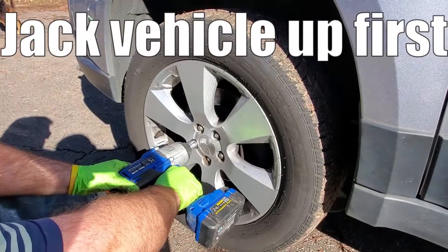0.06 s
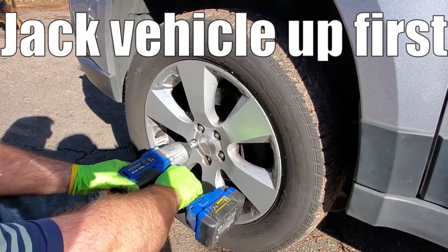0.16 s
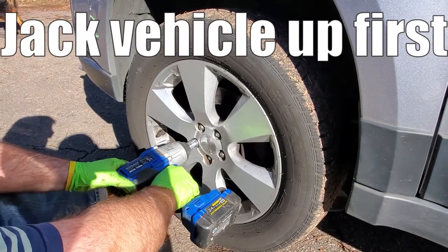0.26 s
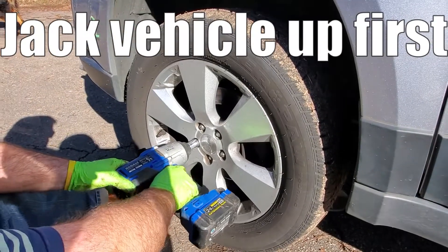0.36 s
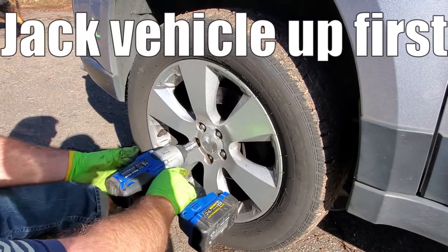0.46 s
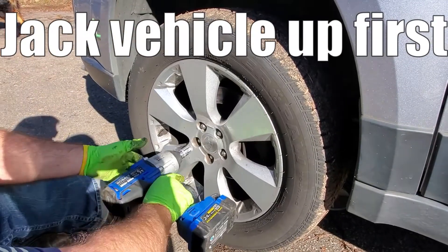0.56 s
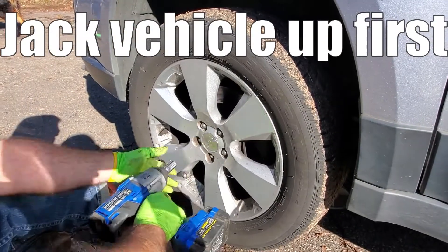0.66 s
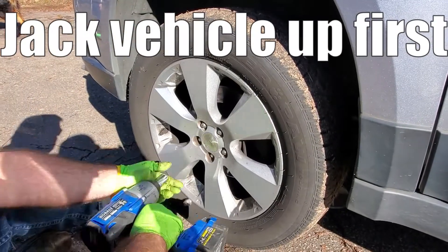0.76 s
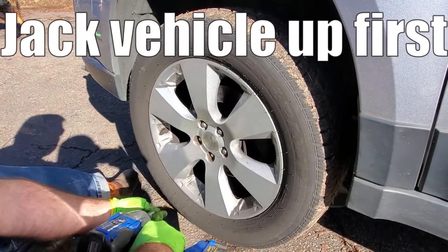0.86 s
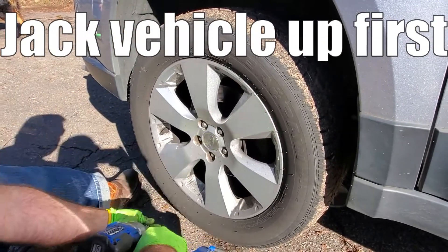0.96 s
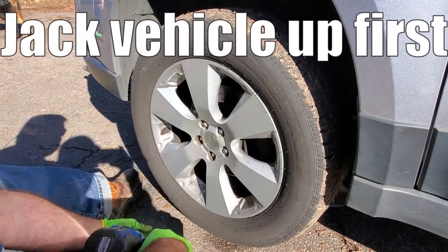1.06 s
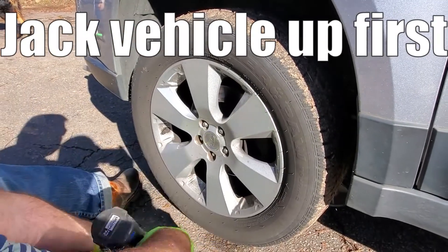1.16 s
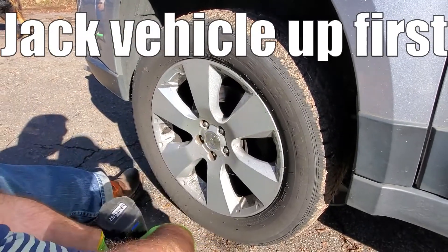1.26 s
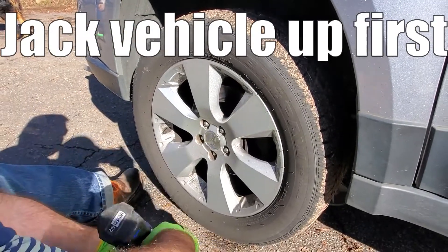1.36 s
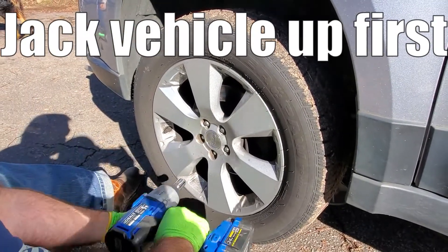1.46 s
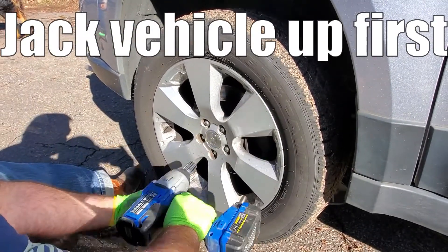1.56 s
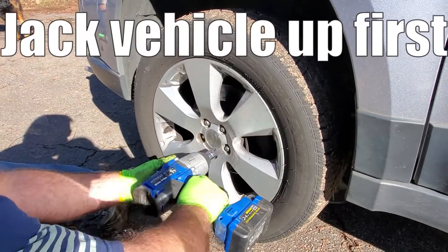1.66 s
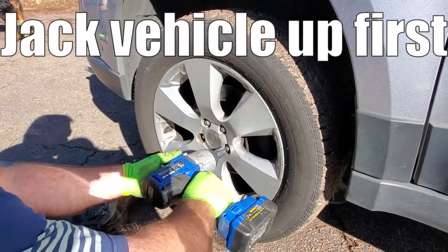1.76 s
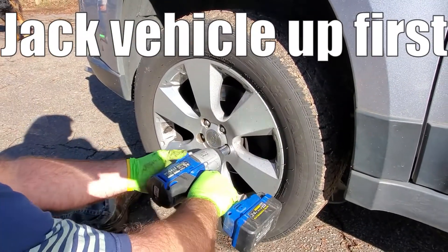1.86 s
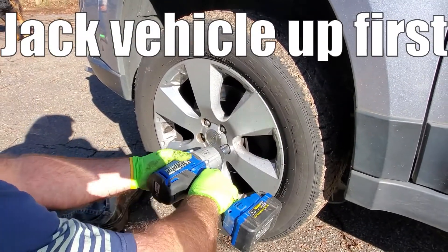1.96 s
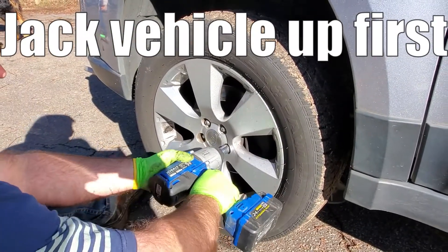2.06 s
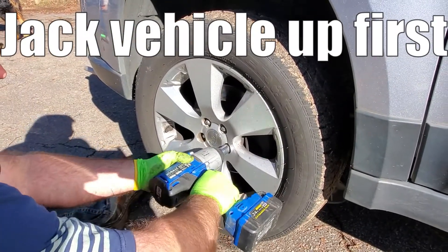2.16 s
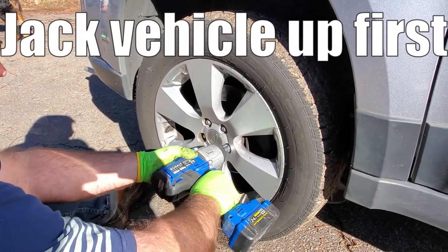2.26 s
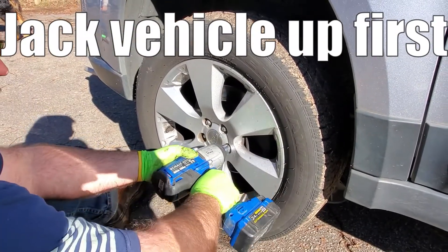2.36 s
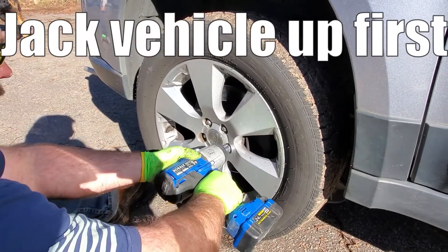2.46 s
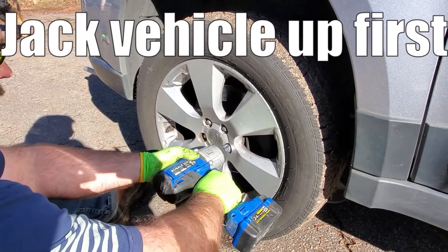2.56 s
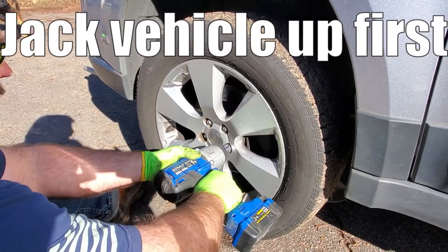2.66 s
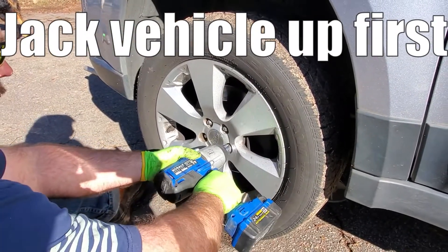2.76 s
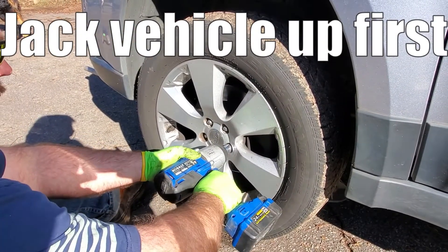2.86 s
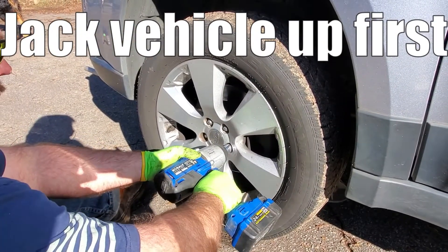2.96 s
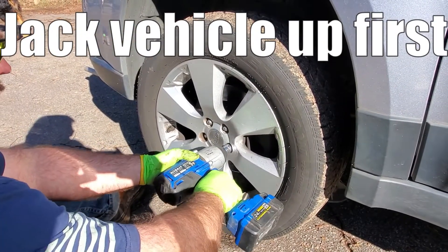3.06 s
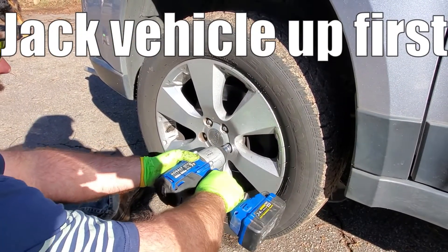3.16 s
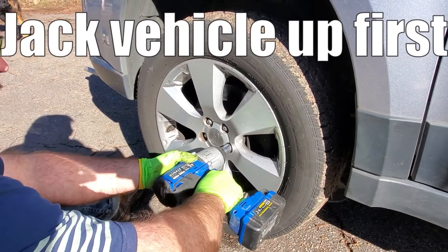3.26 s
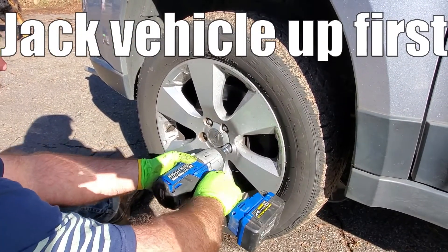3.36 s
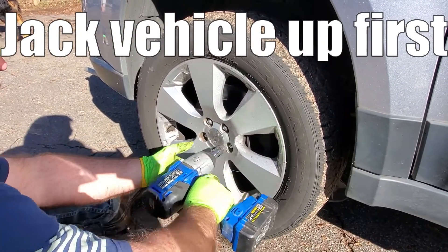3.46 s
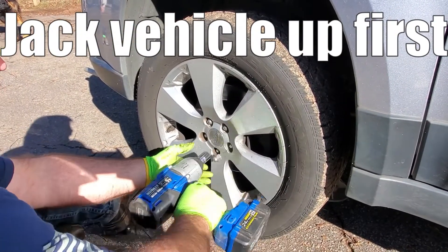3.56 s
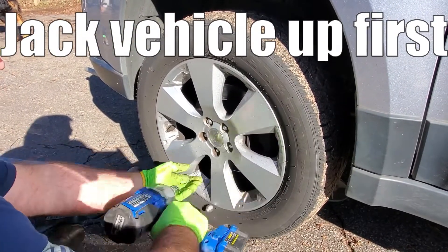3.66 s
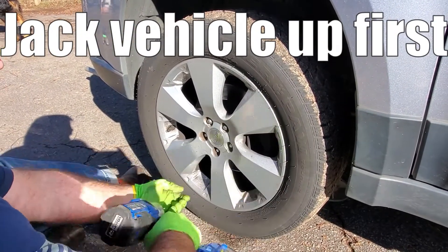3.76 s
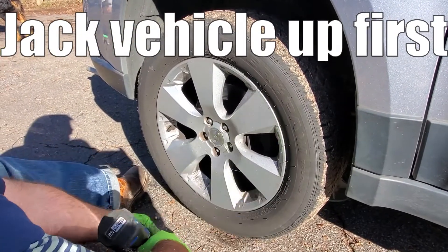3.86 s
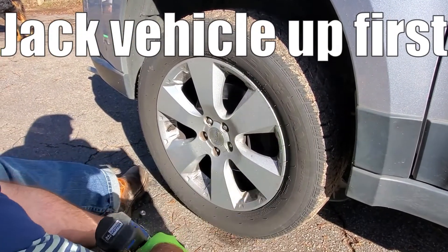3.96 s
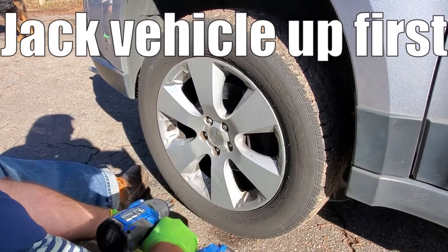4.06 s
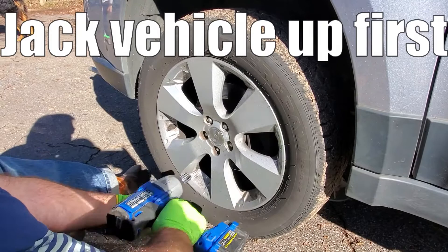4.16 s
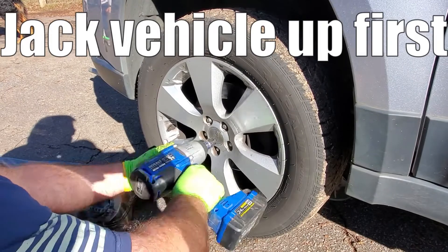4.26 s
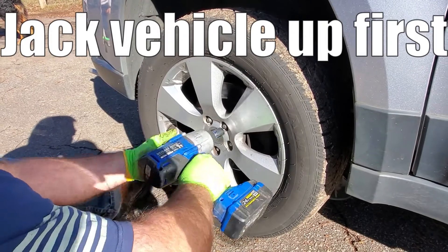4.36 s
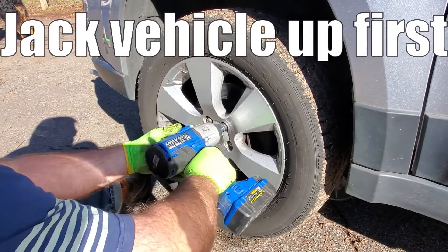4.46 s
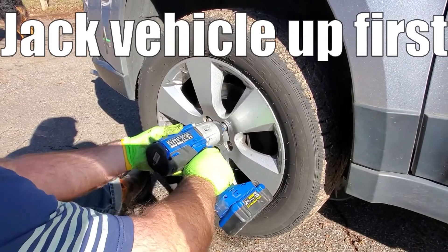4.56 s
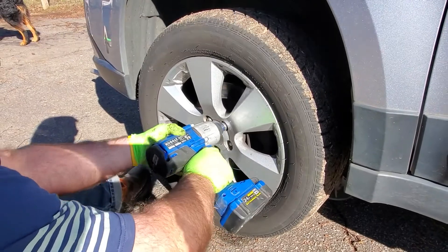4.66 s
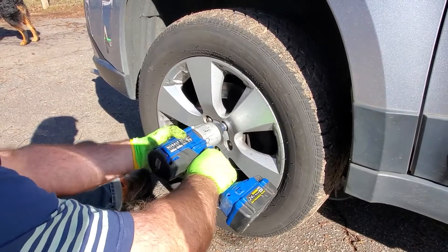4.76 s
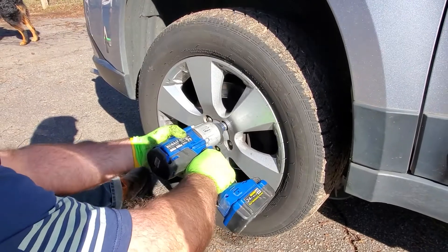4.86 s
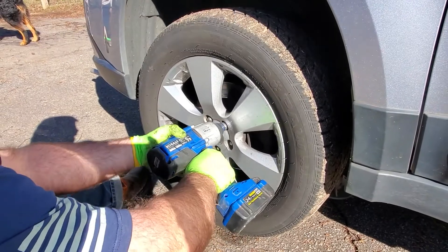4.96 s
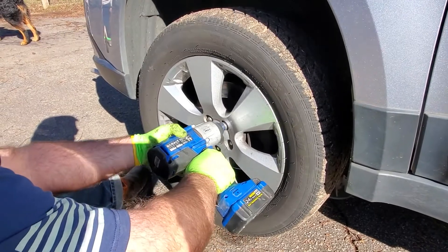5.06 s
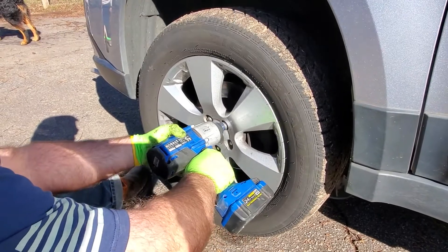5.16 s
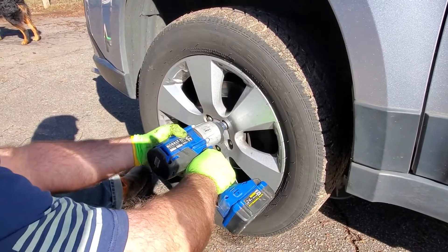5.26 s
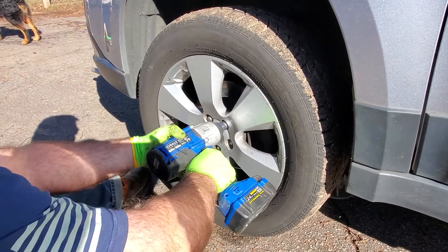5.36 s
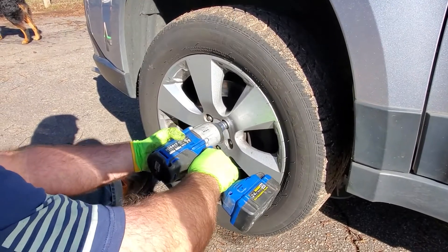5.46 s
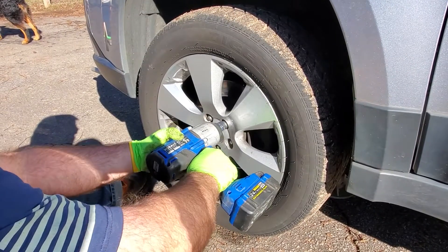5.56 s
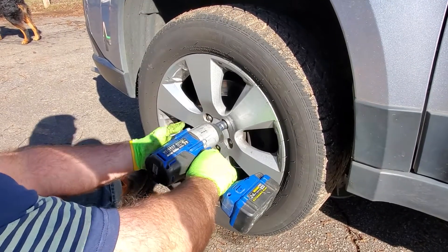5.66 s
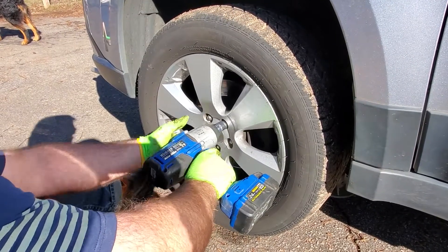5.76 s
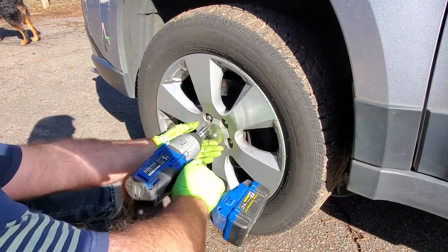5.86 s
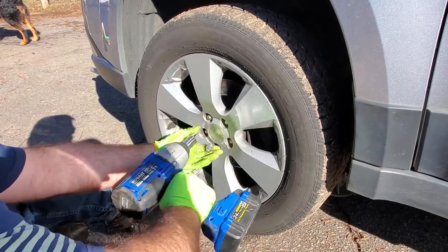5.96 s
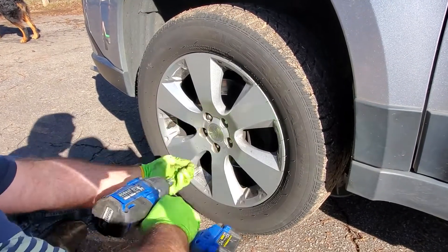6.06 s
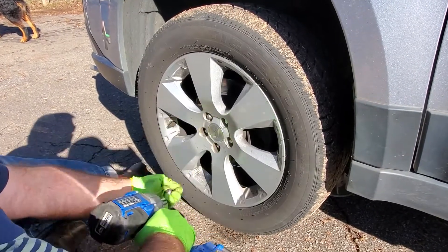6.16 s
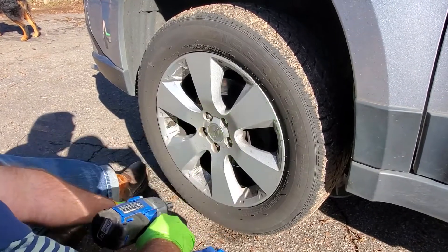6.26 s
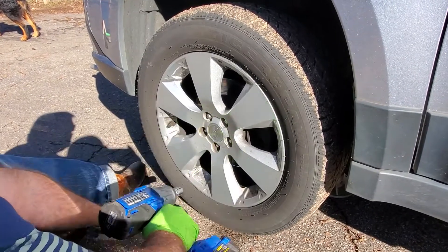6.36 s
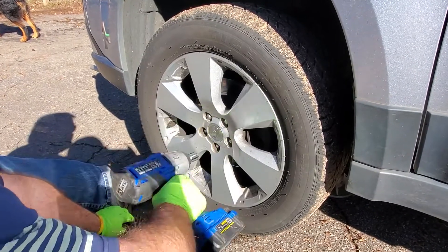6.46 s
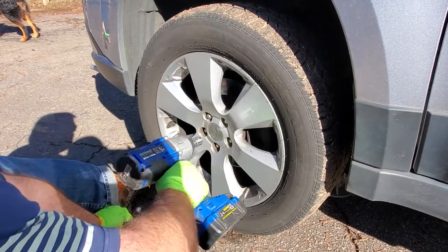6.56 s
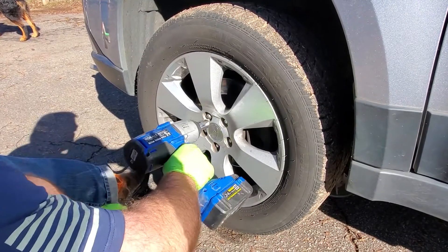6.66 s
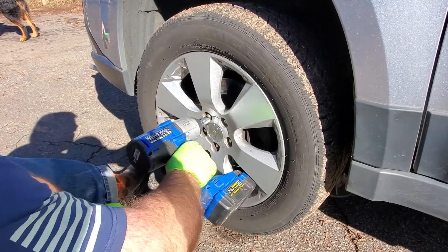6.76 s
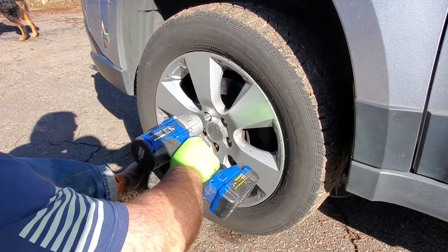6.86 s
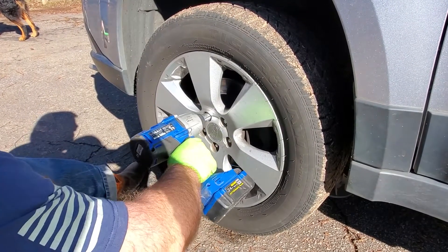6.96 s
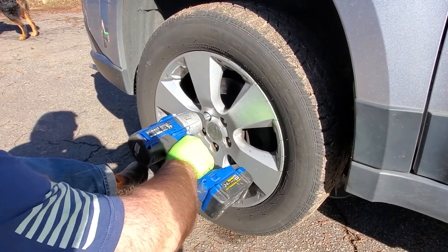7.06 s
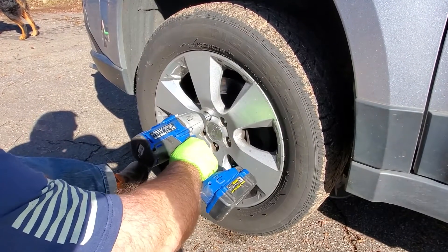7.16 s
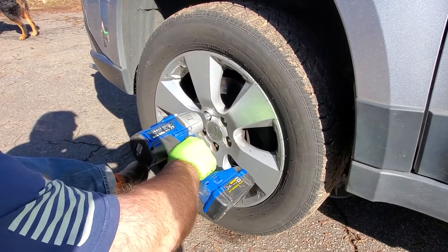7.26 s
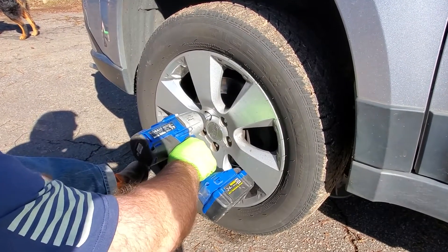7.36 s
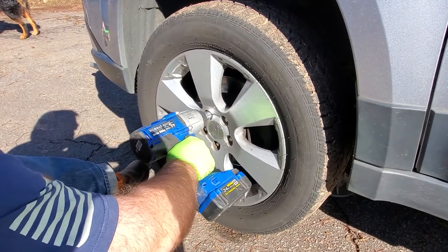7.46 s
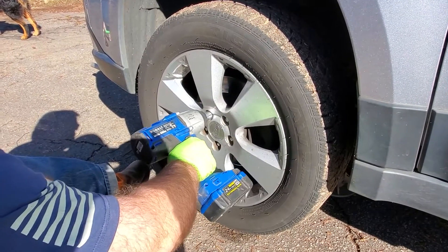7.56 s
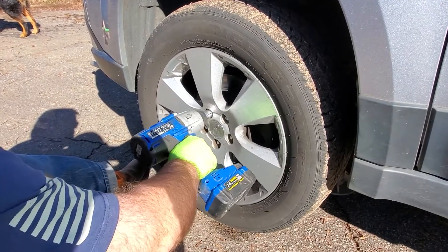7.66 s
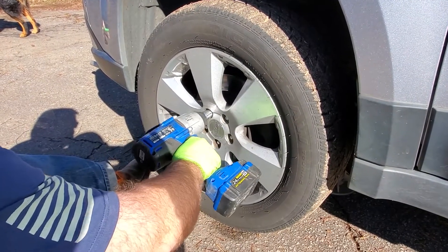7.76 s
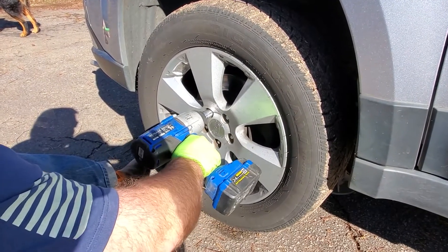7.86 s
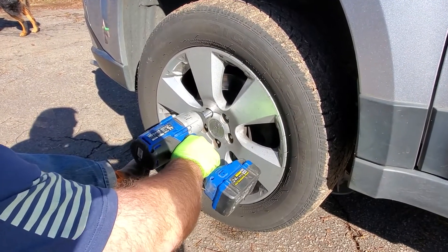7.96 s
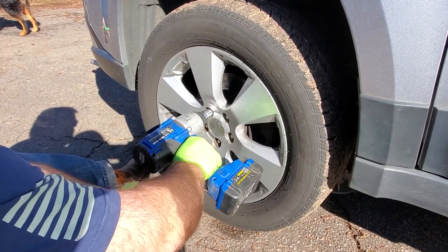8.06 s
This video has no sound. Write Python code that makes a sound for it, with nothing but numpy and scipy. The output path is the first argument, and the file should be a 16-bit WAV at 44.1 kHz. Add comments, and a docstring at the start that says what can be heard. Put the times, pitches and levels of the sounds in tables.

```python
"""A cordless impact wrench loosens wheel nuts outdoors, an arm's length from a small stereo camera.
A first knock leads into a free-running motor that coasts down with a falling whine: gliding sine lines.
On three more nuts the socket knocks and whistles, the hammer strikes about 41 times a second, and the motor
runs free again. Blows are bursts of coloured noise that kick socket and wheel modes into ringing; whir, hiss
and ticks run along, with brief treble squeaks. Throughout, filtered noise makes wind rumble and drones."""
import sys
import numpy as np
from scipy import signal
from scipy.fft import rfft, irfft, next_fast_len
from scipy.io import wavfile
from scipy.ndimage import uniform_filter1d

SR = 44100
rng = np.random.default_rng(int(sys.argv[2]) if len(sys.argv) > 2 else 0)


def dump(signal):
    """Clip the signal to [-1, 1] and save it as 16-bit WAV at the path in sys.argv[1]."""
    limited = np.clip(np.atleast_2d(signal).T, -1, 1)
    pcm = np.round(limited * 32767).astype(np.int16)
    wavfile.write(sys.argv[1], SR, pcm)


N = 358091
T = np.arange(N) / SR  # time, s

# Hammer on anvil, settling to 41 blows a second: start_s, level_db, treble_db (above level)
HAMMER_BLOWS = [(2.5503, -23, -2.5), (2.5673, -36, 12), (2.5803, -34, -8), (2.5895, -24.5, -5),
                (2.6001, -31.5, 3), (2.6132, -26, -9), (2.6364, -21, -3.5), (2.6626, -25.5, -18),
                (2.6698, -23.5, 0), (2.689, -33, -2), (2.697, -23.5, -5), (2.7223, -24.5, -1),
                (2.748, -24.5, 2), (2.7729, -23.5, 0), (2.798, -27, 3.5), (2.8223, -23, .6),
                (2.8472, -28.5, 0), (2.871, -24, 0), (2.8947, -23, 1), (2.919, -23, 0), (2.9439, -24, 0),
                (2.968, -26, 1), (2.992, -22.5, 0.5), (3.0162, -23.5, 0.5), (3.0423, -28, 4),
                (4.91, -28.5, 6.5), (4.9229, -25.5, -2), (4.9384, -25.5, -8), (4.9473, -25, -3),
                (4.9556, -22, -0.5), (4.9677, -30.5, 3), (4.9814, -22.5, -3), (4.9923, -26.5, 1),
                (5.0149, -27, -11), (5.0227, -29, 4), (5.0408, -31, -12), (5.051, -22.5, 0.5),
                (5.0763, -24.5, .6), (5.1012, -27, 1), (5.126, -25, 0.5), (5.1504, -34, 9),
                (5.1752, -24, 3.5), (5.1995, -28, 6), (5.2234, -25.5, 3.5), (5.241, -35.5, -7),
                (5.248, -23, 2.5), (5.2717, -25, 5.5), (5.2965, -25, 2.5), (5.322, -30, -24),
                (5.3471, -28, 6.5), (5.3735, -21.5, -0.7), (7.25, -33.5, 10.5), (7.2768, -26, -15),
                (7.2842, -22, -1.5), (7.295, -26, 1.1), (7.322, -29, -15), (7.3306, -23.5, 7),
                (7.3476, -33, 0), (7.3536, -26, -13), (7.3627, -29, 5), (7.3814, -28, -18),
                (7.3899, -25.5, 4), (7.415, -23.5, 2.5), (7.4399, -26.5, 5), (7.4645, -21, -14),
                (7.4892, -26.5, 7), (7.5135, -24.5, 4), (7.5375, -25, 0.5), (7.5609, -23, 1),
                (7.5861, -24, 5.5), (7.6099, -22.5, 1), (7.6347, -24, 2), (7.6599, -28.5, 3.5)]
# Socket knocks and jolts on the nut, and the last hammer blows as it breaks loose:
# start_s, level_db, treble_db (above level), thud_db (above level), t60_s
KNOCKS_AND_LAST_BLOWS = [(0.0086, -26, -4.5, -14.5, 0.055), (0.029, -46.5, -14, -2, 0.037),
                         (0.0521, -39, -11, -18.5, .042), (1.849, -28.5, -12, -13, 0.043),
                         (1.8543, -23, -6.5, -1.5, 0.057), (1.908, -32.5, -17, -21, 0.055),
                         (1.947, -27.5, -13, -27, 0.036), (1.9712, -36, -19, -15, 0.049),
                         (1.9925, -36, -14, -22, .037), (2.0098, -41, -20, 4.5, 0.037),
                         (2.0254, -23, -16, -19, 0.022), (2.0427, -35, -17, 1.5, 0.067),
                         (2.058, -29, -16, -22, .034), (2.0699, -35, -16, -15, 0.028),
                         (2.0882, -31, -21, -26, 0.026), (2.1128, -37, -16, -14, 0.061),
                         (2.1435, -39.5, -15, -13, 0.037), (2.2524, -32, -11, -17, .12),
                         (2.2903, -29, -12, -4.5, .036), (2.3029, -27.5, -7, -4.5, .04),
                         (2.3255, -21.5, -7, -36, .025), (2.3375, -23.5, -3.5, -20, .056),
                         (2.359, -25.5, -5, -7, 0.078), (2.3821, -21.5, -15, -3.5, 0.03),
                         (2.4034, -29, -4, -13, .069), (2.4161, -25.5, -13, -7, 0.056),
                         (2.4318, -25.5, -11, -17, .022), (2.4484, -26, 0.5, -13, 0.077),
                         (2.512, -36, -12, -15, .04), (2.517, -21.5, -14, -10.5, 0.043),
                         (2.5325, -32, -11, -5.5, 0.15), (3.0683, -25, -0.5, -6.5, 0.032),
                         (3.1066, -39, -13, -18, 0.086), (3.862, -40, -11, -16, 0.048),
                         (4.5015, -35, -2.5, -9, 0.068), (4.5129, -36, -9, 0, 0.042),
                         (4.522, -39.5, -4, 5, 0.076), (4.5314, -33, -17, 2, 0.0099),
                         (4.6067, -31, -14, -15.5, 0.064), (4.6581, -28.5, -6.5, 1.5, 0.068),
                         (4.6782, -37, -17, -10, 0.06), (4.7271, -29.5, -20, -41, 0.023),
                         (4.7441, -37, -21, -18.5, 0.043), (4.758, -29, -15, -19, 0.025),
                         (4.783, -38, -16, -13, 0.026), (4.839, -25.5, -6, -8, 0.11),
                         (4.8813, -22.5, -8, -15, 0.048), (4.8975, -23.5, -5, -11.5, 0.058),
                         (5.3898, -38, -7, -4, 0.022), (6.9249, -36, -28, -11, 0.068),
                         (6.9514, -40.5, -16, 2.5, 0.12), (6.9651, -22.5, -1, -11, 0.039),
                         (7.0322, -38, -10, -25.5, .035), (7.044, -33, -16, -22, .022),
                         (7.0688, -23, -9.5, 0.7, 0.064), (7.0917, -39, -12, -8, .049),
                         (7.1324, -29, -16, -17, .029), (7.1553, -24.5, -19, -26, .032),
                         (7.1744, -22.5, -2.5, -9.5, 0.058), (7.218, -21.5, -8, -10.5, 0.037),
                         (7.2354, -21.5, -7, -11, .046), (7.6851, -29.5, 2.5, -11.5, 0.04)]
# Colour of struck socket and anvil: pitch_hz, relative level_db (per Hz)
STEEL_COLOUR = [(88, -48), (150, -18), (291, -10.5), (354, -25.5), (612, -16), (821, -5), (1120, 3),
                (1900, -8), (2270, -4), (2870, -4.5), (6510, -9.5), (10000, -5), (11300, -7), (14500, -5.5),
                (16000, -4)]
# Colour of the knock through wheel and hub: pitch_hz, relative level_db (per Hz)
THUD_COLOUR = [(70, -37), (180, -1), (420, -2), (700, 0), (1300, 1)]
# Brief modes of socket and anvil: pitch_hz, level_db (against the blow), t60_s
SOCKET_MODES = [(1764, -21.5, 0.049), (2290, -12.5, 0.021), (2630, -17.5, 0.018), (2878, -15, 0.063),
                (3310, -16, 0.052), (3773, -14, 0.032), (4390, -17, 0.013), (6636, -15, 0.034),
                (8270, -13, 0.0095), (11390, -13.5, 0.017), (14650, -13, 0.024)]
# Wheel modes: pitch_hz, t60_s, then level_db at each of six places (against the thud)
WHEEL_MODES = [(525.6, 0.84, -7, -26.5, -29, -28, -30, -23), (612, 1, -0.5, -25.5, -23, -9.5, -12.5, -14.5),
               (1084, 0.95, -21, -22, -12, -27, -14, -18.5), (1190, 0.3, -14, -20, -22, -26, -18, -17)]
# When the socket touches the wheel at a new place: start_s
NEW_PLACE_S = [1.8, 2.4, 4.4, 4.65, 6.8]
# Free running: loose_s (nut comes loose), released_s (trigger let go), end_s (next nut),
# free_hz (rotor rate, before its slow gain), rest_s (time to coast to rest), level_db
FREE_RUNS = [(.03, .42, 1.84, 581, 2.0, 0), (3.085, 3.42, 4.49, 580, 2.05, 1.5),
             (5.39, 5.78, 6.92, 582, 2.12, 0), (7.71, 8.5, 8.5, 578, 2.1, -3)]
# Strong motor lines: multiple (of rotor rate), level_db (at REFERENCE_HZ), slope_db (per octave of rotor rate)
STRONG_MOTOR_LINES = [(8.01, -50, 12), (6, -67, -3.5), (10, -65, 3)]
# Housing resonances the strong lines glide across: pitch_hz, gain_db
HOUSING_PEAKS = [(500, -5), (900, 0), (1200, 2), (1600, -0.5), (2050, -8), (2450, 0), (2650, -3),
                 (2860, 0.5), (3070, -7), (3400, 9), (3600, 1), (3780, 7.5), (3950, -2), (4200, 6.5),
                 (4480, -4), (4650, 2.5), (4900, -0.5), (5500, -12), (6000, -10.5)]
# Weaker motor lines: multiple (of rotor rate), power_db (under power), coast_db (coasting)
WEAK_MOTOR_LINES = [(2, -65, -65), (2.75, -57, -72), (4, -57, -77), (5, -70, -71), (5.5, -70, -86),
                    (7, -75, -68), (11, -78.5, -73), (12, -85, -80), (14, -85, -79)]
# Housing gain for the weaker lines: pitch_hz, gain_db
HOUSING_GAIN = [(500, -21), (800, -7), (1100, -0.5), (1500, -5), (2000, -9), (2800, 4.5), (4000, 7.5),
                (5000, -9), (10000, -23)]
# Rough whistles as the trigger is pulled: start_s, end_s, pitch_hz, level_db
TRIGGER_WHISTLES = [(2.25, 2.333, 3565, -33.5), (2.252, 2.34, 15500, -52), (4.798, 4.89, 15600, -61),
                    (4.812, 4.843, 7840, -54), (7.186, 7.22, 3570, -34), (7.18, 7.235, 15600, -50)]
# Level curves of the running noise, read with straight lines between rows: start_s, whir_db, hiss_db
RUNNING_LEVELS = [(0, -35, -45), (.1, -40, -44), (.44, -41, -47), (.83, -48.5, -55), (1.15, -49.5, -61.5),
                  (1.54, -43, -54.5), (1.84, -46.5, -63), (2.1, -43.5, -62), (2.225, -64.5, -70),
                  (2.26, -35, -52), (2.42, -29, -50), (2.46, -36, -35), (2.505, -38, -61),
                  (2.55, -30.5, -41), (3.06, -34.5, -45), (3.128, -40, -43.5), (3.577, -43, -53),
                  (4.205, -54.5, -61.5), (4.345, -44.5, -55.5), (4.49, -44, -58.5), (4.56, -48.5, -59),
                  (4.8, -43, -60), (4.9, -31.5, -44), (5.38, -38.5, -47), (5.443, -39.5, -45),
                  (5.77, -43.5, -50), (6.43, -52, -60), (6.585, -46.5, -57), (6.88, -41.5, -56.5),
                  (7.0, -47.5, -70), (7.15, -42.5, -58), (7.24, -30, -40), (7.69, -35, -43),
                  (7.717, -41, -46.5), (7.89, -40, -45.5), (8.117, -42.5, -48)]
# Colour of the whir at low rotor rates: pitch_hz, relative level_db (per Hz)
SLOW_WHIR_COLOUR = [(120, -32), (300, -28.5), (540, -21.5), (800, -12.5), (1300, -3.5), (2050, -5.5),
                    (2290, 3), (2550, -4.5), (3500, -7), (4600, -13), (6050, -14.5), (6450, -4),
                    (6850, -14.5), (9000, -25)]
# Colour of the whir near full speed: pitch_hz, relative level_db (per Hz)
FAST_WHIR_COLOUR = [(120, -31.5), (600, -10.5), (900, -9.5), (1600, -3), (1950, -5.5), (2300, -2),
                    (2600, -5), (3200, -4.5), (3850, -1.5), (4400, -4.5), (5200, -12.5), (6400, -6),
                    (7300, -16), (9000, -18)]
# Colour of the loose steel ticks: pitch_hz, relative level_db (per Hz)
CHATTER_COLOUR = [(4000, 20.5), (8000, -4.5), (10000, -2), (11500, -3), (14500, -6.5), (16500, -13)]
# Thin treble squeaks and ticks: start_s, level_db, pitch_hz, t60_s
TREBLE_SQUEAKS = [(0.5048, -51, 14470, 0.06), (0.6644, -45, 14370, 0.077), (0.8924, -59, 14420, 0.06),
                  (3.4151, -44, 14500, 0.11), (3.4486, -43, 13940, 0.048), (4.9003, -24, 14000, 0.06),
                  (4.9244, -23, 13900, 0.06), (5.6854, -48, 14000, 0.042), (5.692, -45, 13800, 0.06),
                  (5.7329, -40, 14500, 0.064), (5.7808, -45, 14500, 0.058), (5.8252, -43, 14000, 0.061),
                  (7.237, -22.5, 14600, 0.11), (7.9994, -42, 14200, 0.063), (8.0394, -59, 14500, 0.053),
                  (8.0676, -52, 14300, 0.055)]
# Wind curves, read with straight lines between rows: start_s, level_db, pan_db (left minus right)
WIND_LEVELS = [(0, -57, -1), (.65, -74.5, 2), (1.08, -66.5, 9), (1.35, -52, 14), (1.5, -58.5, 0),
               (1.7, -44, 5), (1.79, -56, -1), (1.94, -39.5, 13.5), (2.12, -44, -4), (2.24, -46.5, 7),
               (2.5, -48, -2), (2.65, -58.5, -4), (3.5, -69, 3), (4.25, -73, 2), (4.57, -50.5, -4),
               (4.86, -45.5, -1), (4.95, -64.5, 0), (5.45, -58, 0), (6.26, -78, -2), (6.81, -59, 0),
               (7.1, -47.5, 0), (7.24, -51, 2), (7.35, -62.5, -5), (8.12, -66, 1)]
# Colour of the wind rumble: pitch_hz, relative level_db (per Hz)
WIND_RUMBLE_COLOUR = [(15, -33), (30, -16), (60, -1), (95, -0.5), (130, -8.5), (250, -19), (400, -53)]
# Steady distant drones: pitch_hz, width_hz, level_db
DISTANT_DRONES = [(89.3, 3, -70.5), (537, 7.1, -74), (604, 120, -73)]
# Likeness of the two ports: pitch_hz, correlation (left with right)
PORT_LIKENESS = [(70, 0.58), (130, 1), (400, 0.86), (800, 0.85), (1400, 0.28), (4000, 0.1), (7000, 0.34),
                 (13000, 0.66)]
# Shading by the camera body: pitch_hz, pan_db (left minus right)
BODY_TILT = [(60, 0), (110, -0.5), (200, 1), (380, 0.5), (700, 3), (1290, 3), (2380, 10), (4400, -3),
             (8120, 4.5), (15000, 2)]

HAMMER_THUD_DB, HAMMER_T60_S = -19, 0.038  # typical thud above the blow, and its decay
THUD_SCATTER_DB, PAN_SCATTER_DB = 3, 2.5  # spread from blow to blow
TREBLE_RISE_S = .002  # blows' treble attack
LOADED_HZ, SPIN_UP_S, CREEP_HZ_PER_S = 532, .022, 55  # rotor rate under load, its leap when freed, its slow gain
COAST_POWER = 1.87  # coasting rate = released rate * (share of coasting time left) ** power
REFERENCE_HZ = 600  # rotor rate for the strong lines' levels
FLARE_DB, SHIMMER_DB = 2.5, 1.5  # slow and quick level wander of the strong lines
FLICKER_DB = 1  # level wander of the whir
CHATTER_DB = -8  # loose steel, against the hiss
SHAKE_DB = (-6.5, -13.5, -16)  # whir, hiss and chatter shaken up by a blow, against its level
SHAKE_RISE_S, SHAKE_T60_S = 0.0027, 0.078  # smoothing time constant and decay of that shake
LEFT_DB = 4.5  # left minus right: the tool is to the left
GUST_DB = 3  # each port has its own eddies
TOP_HZ = 15850  # treble limit of the camera


def undb(db):
    """Decibels to a plain gain."""
    return 10 ** (np.asarray(db) / 20)


def on_log(hz, table):
    """A (pitch_hz, value) table read on a log-frequency axis."""
    table_hz, values = np.transpose(table)
    return np.interp(np.log(np.maximum(hz, 1)), np.log(table_hz), values)


def pair(pan_db):
    """Left and right gains that differ by pan_db."""
    return undb(np.array([[.5], [-.5]]) * pan_db)


def decay(t, t60):
    """Exponential fall of 60 dB in t60 seconds."""
    return np.exp(-np.log(1000) * t / t60)


def noise(colour):
    """Two channels of coloured noise, rms 1, as alike as the port spacing allows."""
    size = next_fast_len(N)
    hz = np.arange(size // 2 + 1) * SR / size
    likeness = np.clip(on_log(hz, PORT_LIKENESS), -.5, 1)
    mid, side = rfft(rng.standard_normal((2, size))) * undb(on_log(hz, colour))
    mid, side = mid * np.sqrt(1 + likeness), side * np.sqrt(1 - likeness)
    spectrum = np.array([mid + side, mid - side]) * pair(on_log(hz, BODY_TILT))
    x = irfft(spectrum, size)[:, :N]
    return x / x.std()


def band(x, lo_hz, hi_hz):
    """One frequency band, brought to rms 1."""
    y = signal.sosfilt(signal.butter(2, [lo_hz, hi_hz], "band", fs=SR, output="sos"), x)
    return y / y.std()


def walk(rate):
    """Random levels, rate of them a second, with straight slides between; spread 1."""
    hold = int(SR / rate)
    steps = np.repeat(rng.standard_normal(N // hold + 1), hold)
    levels = uniform_filter1d(steps, hold)[:N]
    return levels / levels.std()


def add(track, s, shape):
    """Lays a shape into a track from time s."""
    i = int(s * SR)
    n = min(shape.shape[-1], N - i)
    track[..., i:i + n] += shape[..., :n]


def struck():
    """Knocks and hammer blows together, in rows of start_s, level_db, treble_db, thud_db, t60_s."""
    count = len(HAMMER_BLOWS)
    thud_db = HAMMER_THUD_DB + THUD_SCATTER_DB * rng.standard_normal(count)
    hammer = np.column_stack([HAMMER_BLOWS, thud_db, np.full(count, HAMMER_T60_S)])
    return np.vstack([KNOCKS_AND_LAST_BLOWS, hammer])


def blows(hits, rise_s=0.00045, treble_t60=0.58, thud_t60=1.59, crest_db=2):
    """Steel on steel: a quick rise and a dying rattle, where the thud lasts longest and the treble least."""
    steel, t = noise(STEEL_COLOUR), T[:SR // 5]
    envelopes = np.zeros((3, 2, N))
    pans_db = PAN_SCATTER_DB * rng.standard_normal(len(hits))
    for (s, db, treble_db, thud_db, t60), pan_db in zip(hits, pans_db):
        # band level dB, stretch of t60, rise s
        parts = [(thud_db, thud_t60, rise_s), (0, 1, rise_s), (treble_db, treble_t60, TREBLE_RISE_S)]
        for envelope, (part_db, stretch, rise) in zip(envelopes, parts):
            shape = np.minimum(t / rise, 1) * decay(t, max(t60 * stretch, .005))
            add(envelope, s - rise / 2, undb(db + part_db + crest_db) * pair(pan_db) * shape)
    bands = band(noise(THUD_COLOUR), 78, 1120), band(steel, 1890, 6260), band(steel, 10100, 14440)
    return sum(envelope * b for envelope, b in zip(envelopes, bands))


def ring(kicks, hz, t60):
    """One mode: a resonator that each kick sets off as a dying sine."""
    pole = np.exp(2j * np.pi * hz / SR - np.log(1000) / (t60 * SR))
    return signal.lfilter([1], [1, -pole], kicks).imag


def rings(hits, ring_db=8):
    """Every blow sets the socket's modes going in new random shares; its thud kicks the wheel's modes."""
    s, db, treble_db, thud_db = hits.T[:4]
    at, out = (s * SR).astype(int), 0
    share = rng.standard_normal((len(s), len(SOCKET_MODES), 2))
    for k, (hz, mode_db, t60) in enumerate(SOCKET_MODES):
        kicks = np.zeros((2, N))
        kick_db = db + mode_db + ring_db + treble_db * (hz > 8000)
        kicks[:, at] = share[:, k].T * undb(kick_db)
        out = out + ring(kicks, hz, t60)
    place = np.searchsorted(NEW_PLACE_S, s)
    for hz, t60, *place_db in WHEEL_MODES:
        kicks = np.zeros(N)
        kicks[at] = undb(db + thud_db + np.array(place_db)[place])
        out = out + ring(kicks, hz, t60)
    return out


def rotor():
    """Rotor rate: it leaps when freed, gains slowly, then coasts; also free-running gain and coasting share."""
    hz, free, coasting = np.full(N, 1. * LOADED_HZ), np.zeros(N), np.zeros(N)
    for loose, released, end, free_hz, rest_s, db in FREE_RUNS:
        driven_s = np.clip(T - loose, 0, released - loose)
        lag_hz = (free_hz - LOADED_HZ) * np.exp(-driven_s / SPIN_UP_S)
        driven_hz = free_hz + CREEP_HZ_PER_S * driven_s - lag_hz
        time_left = np.clip(1 - np.maximum(T - released, 0) / rest_s, .01, 1)
        on = (T >= loose) & (T < end)
        hz[on] = (driven_hz * time_left ** COAST_POWER)[on]
        free[on] = undb(db)
        coasting[on & (T > released)] = 1
    # soften the switching
    return hz, uniform_filter1d(free, size=350), uniform_filter1d(coasting, size=2000)


def motor(waver=0.0022, patchy_db=4):
    """The whine: multiples of the rotor rate come and go as they cross the housing's resonances."""
    out = np.zeros((2, N))
    hz, free, coasting = rotor()
    turn = 2 * np.pi * np.cumsum(hz * (1 + waver * walk(60))) / SR
    lines = []
    for k, db, slope_db in STRONG_MOTOR_LINES:
        speed_db = slope_db * np.log2(hz / REFERENCE_HZ)
        wander_db = FLARE_DB * walk(12) + SHIMMER_DB * walk(35)
        lines.append((k, db + speed_db + on_log(k * hz, HOUSING_PEAKS) + wander_db))
    for k, power_db, coast_db in WEAK_MOTOR_LINES:
        db = power_db + coasting * (coast_db - power_db)
        lines.append((k, db + on_log(k * hz, HOUSING_GAIN) + patchy_db * walk(12)))
    for k, db in lines:
        # the two ports hear each line at a different phase
        phase = np.array([[0], [1]]) * rng.uniform(-1, 1)
        out += np.sqrt(2) * undb(db) * np.sin(k * turn + phase)
    return out * free


def whistles(width=0.029, edge_s=0.0056):
    """Narrow bands of noise while the motor is switched on under load; width is a share of the pitch."""
    out = 0
    for start, end, hz, db in TRIGGER_WHISTLES:
        gate = np.clip(np.minimum(T - start, end - T) / edge_s, 0, 1)
        tone = band(rng.standard_normal((2, N)), hz * (1 - width / 2), hz * (1 + width / 2))
        out = out + undb(db) * gate * tone
    return out


def shaking(hits):
    """A smoothed, dying envelope that every blow lifts."""
    shake = np.zeros(N)
    shake[(hits[:, 0] * SR).astype(int)] = undb(hits[:, 1])
    shake = signal.lfilter([1], [1, -decay(1 / SR, SHAKE_T60_S)], shake)
    smooth = 1 / (SHAKE_RISE_S * SR)
    return signal.lfilter([smooth], [1, smooth - 1], shake)


def running(hits, low_db=-9, grains=900, scatter_db=2, grain_s=0.007, slow_hz=250, fast_hz=520):
    """A flickering whir in the housing's resonances, and dense small ticks of loose steel above it."""
    s, whir_db, hiss_db = np.transpose(RUNNING_LEVELS)
    shake = shaking(hits)
    whir_gain, hiss_gain, tick_gain = (
        np.hypot(undb(np.interp(T, s, db)), undb(shake_db) * shake)
        for db, shake_db in zip([whir_db, hiss_db, hiss_db + CHATTER_DB], SHAKE_DB))
    # the colour crossfades with rotor rate
    fast = np.clip((rotor()[0] - slow_hz) / (fast_hz - slow_hz), 0, 1)
    colours = noise(SLOW_WHIR_COLOUR), noise(FAST_WHIR_COLOUR)
    whir = 0
    for lo, hi, gain in [(200, 1400, whir_gain * undb(low_db)), (1150, 5000, whir_gain), (4200, 8000, hiss_gain)]:
        slow_part, fast_part = (band(c, lo, hi) for c in colours)
        blend = np.sqrt(1 - fast) * slow_part + np.sqrt(fast) * fast_part
        whir = whir + gain * undb(FLICKER_DB * walk(40)) * blend
    # about `grains` ticks a second, each a small decaying burst
    ticks = (rng.random(N) < grains / SR) * undb(scatter_db * rng.exponential(size=N))
    ticks = signal.lfilter([1], [1, -np.exp(-1 / (grain_s * SR))], ticks)
    chatter = band(noise(CHATTER_COLOUR), 9460, 18800) * ticks / np.sqrt(np.mean(ticks ** 2))
    return whir + chatter * tick_gain


def squeaks(flutter_hz=70, depth=.4):
    """Short dying sines near the top of hearing, fluttering in level."""
    out, t = np.zeros(N), T[:SR // 4]
    for s, db, hz, t60 in TREBLE_SQUEAKS:
        envelope = np.minimum(t / .002, 1) * decay(t, t60)
        flutter = 1 + depth * np.cos(2 * np.pi * flutter_hz * t)
        add(out, s, undb(db) * envelope * flutter * np.sin(2 * np.pi * hz * t))
    return out


def outdoors():
    """Gusts rumble on the ports as low coloured noise, over narrow noise bands for distant drones."""
    s, db, pan_db = np.transpose(WIND_LEVELS)
    eddies = undb(GUST_DB * np.array([walk(9), walk(9)]))
    gusts = undb(np.interp(T, s, db)) * pair(np.interp(T, s, pan_db)) * eddies
    out = noise(WIND_RUMBLE_COLOUR) * gusts
    for hz, width_hz, hum_db in DISTANT_DRONES:
        out = out + undb(hum_db) * band(rng.standard_normal(N), hz - width_hz / 2, hz + width_hz / 2)
    return out


def scene():
    """The wrench's blows, tones and running noise, over the outdoors."""
    hits = struck()
    tones = rings(hits) + motor() + whistles() + squeaks()
    return blows(hits) + running(hits) + pair(LEFT_DB) * tones + outdoors()


def record(dry):
    """The camera cuts the top with a steep low-pass."""
    return signal.sosfilt(signal.ellip(10, .2, 60, TOP_HZ, fs=SR, output="sos"), dry)


dry = scene()
out = record(dry)
dump(out)
```